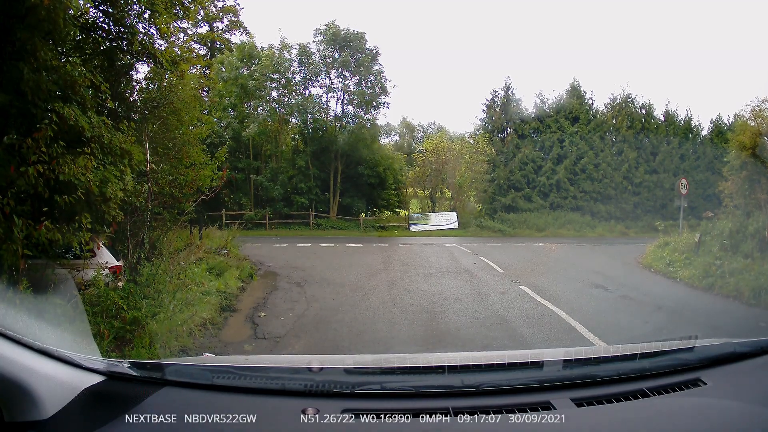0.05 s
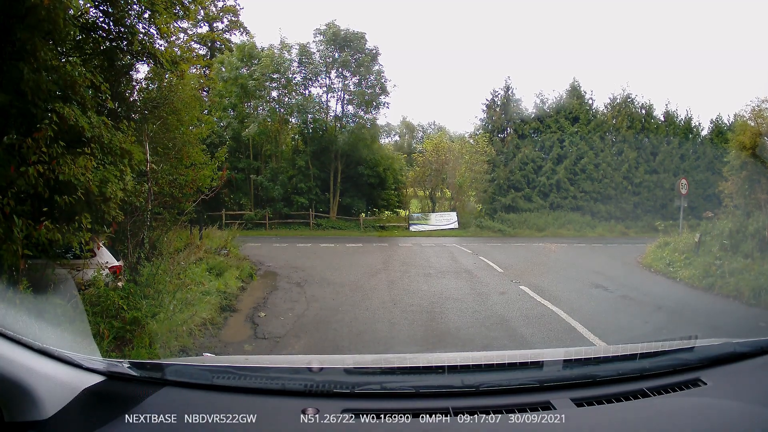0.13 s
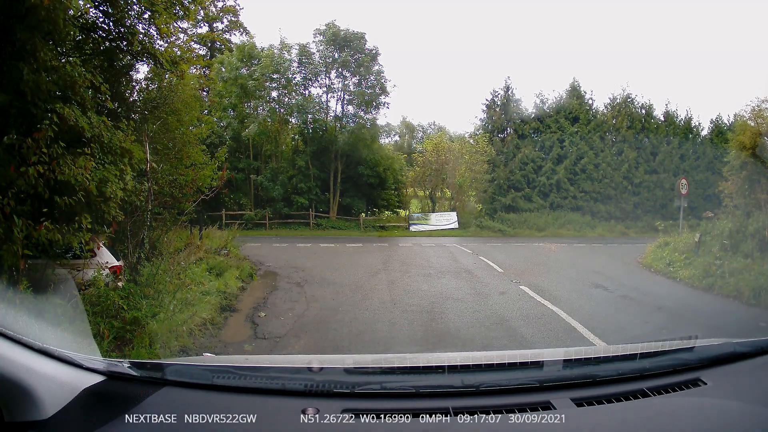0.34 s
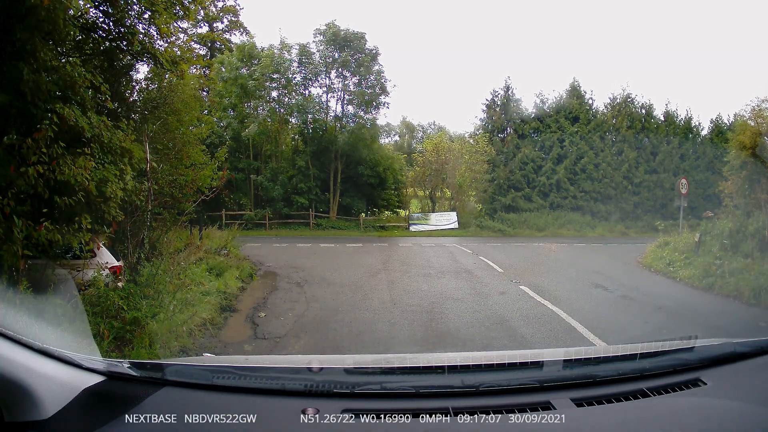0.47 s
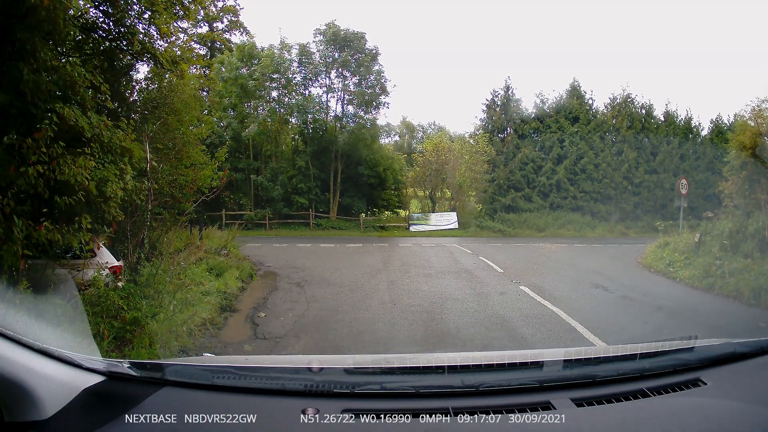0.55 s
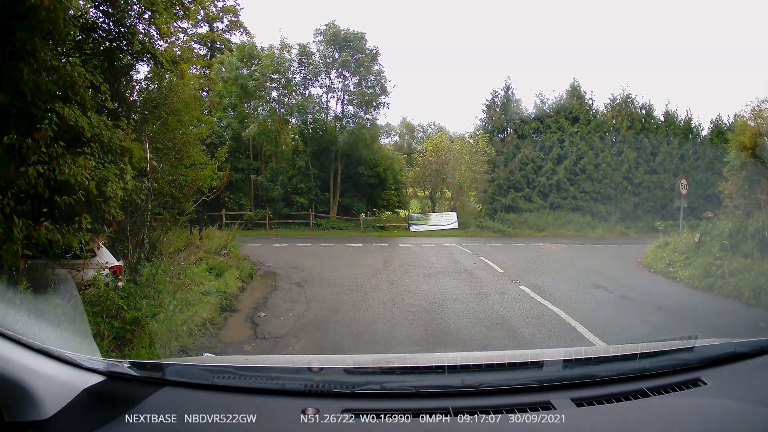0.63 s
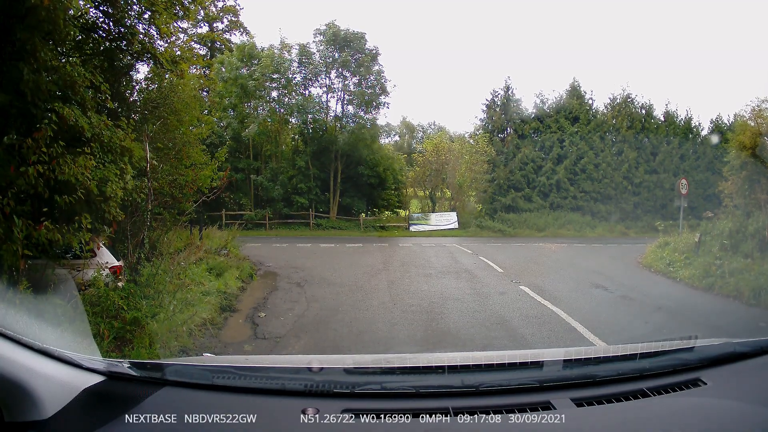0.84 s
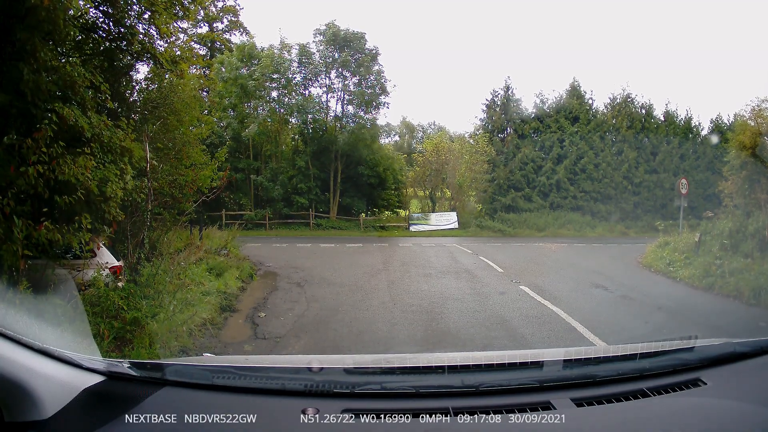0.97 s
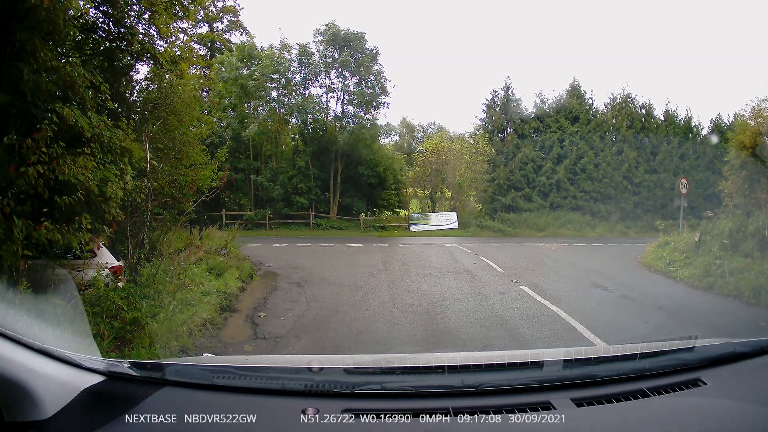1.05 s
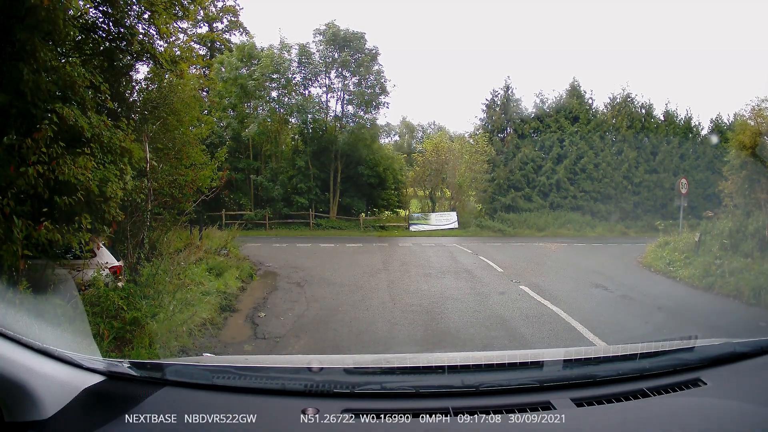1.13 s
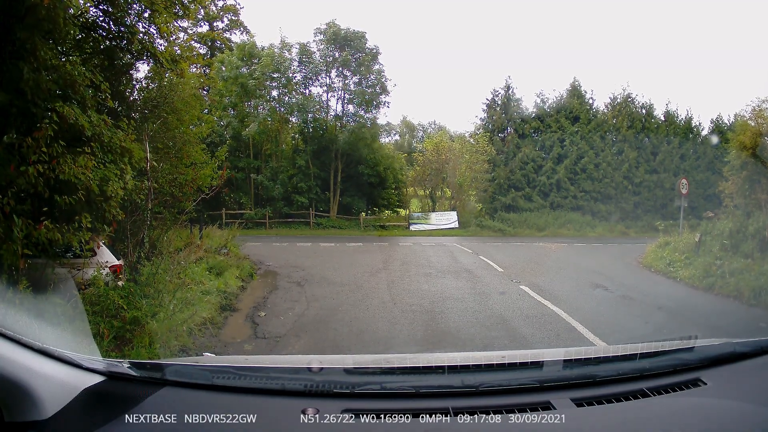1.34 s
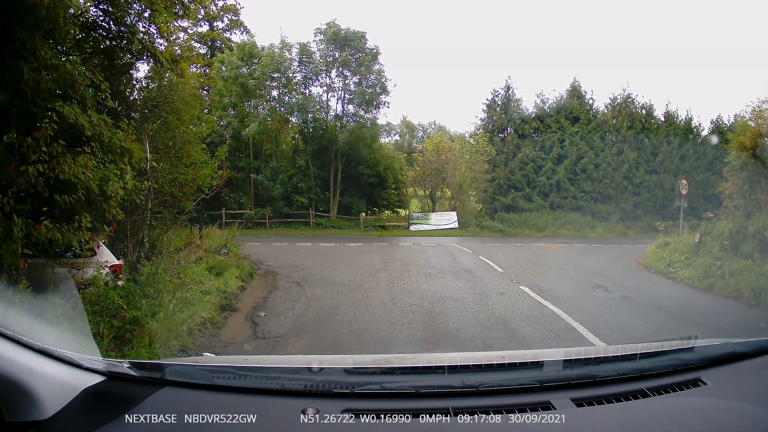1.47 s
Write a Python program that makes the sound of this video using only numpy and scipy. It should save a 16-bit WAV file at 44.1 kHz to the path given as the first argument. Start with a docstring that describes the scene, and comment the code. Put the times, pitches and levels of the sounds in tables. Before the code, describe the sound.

Plastic trim creaks and snaps into place with a loud clunk inside an idling car.

```python
"""Inside a car idling at a country junction, plastic trim is handled close to the microphone.
Over the engine's hum, the trim first ticks and creaks as it sticks and slips. It knocks, slides
with a few low bumps, then snaps home with a clunk that overloads the microphone.
A lighter latch click follows, while the tyre noise of traffic swells outside."""
import sys
import numpy as np
from scipy import signal
from scipy.fft import rfft, irfft
from scipy.io import wavfile

SR = 44100
rng = np.random.default_rng(int(sys.argv[2]) if len(sys.argv) > 2 else 0)


def transcribe(signal):
    """Save signal, clipped to [-1, 1], as a 16-bit WAV file at the path in sys.argv[1]."""
    frames = np.atleast_2d(signal).T
    limited = np.clip(frames, -1, 1)
    pcm = np.round(limited * 32767).astype(np.int16)
    wavfile.write(sys.argv[1], SR, pcm)


N = 66150
T = np.arange(N) / SR


def from_db(db):
    """Turn decibels into a number to multiply a sound by."""
    return 10 ** (np.asarray(db) / 20)


def rms_one(x):
    """Scale a sound so that its average strength (rms) is 1."""
    return x / np.sqrt(np.mean(x ** 2) + 1e-20)


def gains(rows):
    """Turn rows of (time [s], level [dB], ...) into one volume curve per level column."""
    times, *columns = np.transpose(rows)
    return [from_db(np.interp(T, times, levels)) for levels in columns]


def band(x, edges_hz, order=2):
    """Keep the frequencies between two edges, at strength 1."""
    band_pass = signal.butter(order, edges_hz, "band", fs=SR, output="sos")
    return rms_one(signal.sosfilt(band_pass, x))


def noise(spectrum):
    """Steady noise of strength 1, shaped by rows of (frequency [Hz], relative level [dB])."""
    hz, db = np.transpose(spectrum)
    f = np.maximum(np.arange(N // 2 + 1) * SR / N, 1)
    shape = from_db(np.interp(np.log(f), np.log(hz), db))
    return rms_one(irfft(rfft(rng.standard_normal(N)) * shape, N))


def drift(rate_hz):
    """A slow random wobble of strength 1."""
    f = np.arange(N // 2 + 1) * SR / N
    return rms_one(irfft(rfft(rng.standard_normal(N)) / (1 + (f / rate_hz) ** 2), N))


def envelope(start, rise, fade):
    """A volume curve that rises in a straight line, then falls 60 dB every `fade` seconds."""
    rise = max(rise, 1 / SR)
    return np.clip((T - start) / rise, 0, 1) * from_db(-60 * np.maximum(T - start - rise, 0) / fade)


def cabin_noise():
    """The inside of the car rumbles and the fan hisses."""
    # tone of the rumble and hiss: (frequency [Hz], relative level [dB])
    spectrum = [(20, -16.5), (45, -1), (85, -23.5), (125, -8.5), (300, -13.5), (600, -24), (1500, -34),
                (2500, -29.5), (4500, -34.5), (6800, -38), (8500, -65.5)]
    # their loudness: (time [s], level [dB])
    levels = [(0, -40.5), (0.3, -39), (0.7, -38), (0.95, -42), (1.2, -42), (1.5, -46)]
    return gains(levels)[0] * noise(spectrum)


def traffic():
    """A passing vehicle's low drone and tyre noise come through the glass."""
    # tone of the drone: (frequency [Hz], relative level [dB])
    drone = [(25, -12), (68, 1.5), (110, -4.5), (160, -1), (260, -10.5), (380, -9), (520, -9.5), (700, -9),
             (1200, -31.5), (3000, -42.5)]
    # tone of the tyres: (frequency [Hz], relative level [dB])
    tyres = [(200, -20), (500, -18), (720, -5), (950, 2), (1200, -8.5), (1600, -12), (2250, -24.5),
             (3500, -39), (6800, -59), (8500, -82)]
    # loudness as it passes: (time [s], drone level [dB], tyre level [dB])
    passing = [(0, -48.5, -51), (0.3, -52, -66), (0.55, -38.5, -44), (0.8, -37, -37), (1.0, -34, -36.5),
               (1.14, -33, -34), (1.28, -38.5, -34.5), (1.5, -38, -36.5)]
    drone_gain, tyre_gain = gains(passing)
    return drone_gain * noise(drone) + tyre_gain * noise(tyres)


def engine():
    """The idling engine hums two low notes that waver in pitch and level and slowly get quieter."""
    # notes of the hum: (pitch [Hz], average level at the start [dB])
    hum = [(82, -39.5), (108, -38.5)]
    waver_db, wander_hz, fade_db_per_s = 1.5, 2.5, 3
    out = 0
    for hz, db in hum:
        gain = from_db(db + waver_db * drift(4) - fade_db_per_s * T)
        phase = 2 * np.pi * np.cumsum(hz + wander_hz * drift(6)) / SR
        out += gain * np.sqrt(2) * np.sin(phase)
    return out


def pings():
    """Small metal parts ring on faintly after a jolt."""
    # ringing parts: (time [s], pitch [Hz], level [dB], fade [s])
    parts = [(0.455, 2950, -41.5, 0.27), (0.865, 5180, -62.5, .5)]
    return sum(from_db(db) * envelope(start, 0, fade) * np.sin(2 * np.pi * hz * (T - start))
               for start, hz, db, fade in parts)


def slips(per_second=5500, spread_db=2):
    """Rubbing surfaces stick and slip, making a stream of tiny clicks of uneven size."""
    sizes = from_db(spread_db * np.minimum(rng.exponential(1, N), 4)) * rng.choice([-1, 1], N)
    return sizes * (rng.random(N) < per_second / SR)


def trim_ring(x):
    """The plastic trim colours a contact sound by ringing at its own pitches."""
    # pitches of the trim: (pitch [Hz], width [Hz], boost [dB])
    resonances = [(2300, 66, 2), (2420, 43, 4.5), (3535, 74, 6), (4020, 64, 2.5), (4490, 74, 5),
                  (4870, 140, -0.5), (6370, 81, 7.5)]
    out = x
    for hz, width_hz, db in resonances:
        r = np.exp(-np.pi * width_hz / SR)  # share of the ringing left after one sample
        feed = (1 - r * r) / 2
        feedback = [1, -2 * r * np.cos(2 * np.pi * hz / SR), r * r]
        ringing = signal.lfilter([feed, 0, -feed], feedback, x + 1e-18)
        out = out + (from_db(db) - 1) * ringing
    return out


def ticks():
    """Each tick or creak is a short burst of slips, plus a note from the part that slipped."""
    # ticks of the plastic: (time [s], rise [s], fade [s], low band [relative dB],
    # middle band [relative dB], top band [relative dB], note pitch [Hz], note level [dB])
    events = [(0.001, .002, 0.13, -52, -45, -47, 3300, -55),
              (0.027, 0.0013, 0.047, -43, -35.5, -37.5, 2650, -35),
              (0.086, 0.0014, 0.061, -41.5, -56, -50, 2430, -43),
              (0.0936, .001, 0.079, -57, -45.5, -35, 5350, -39),
              (0.122, 0.0022, 0.056, -47, -48, -48, 1780, -37.5),
              (0.148, 0.00086, 0.056, -31.5, -46, -38.5, 2520, -30.5),
              (0.157, 0.011, 0.066, -40, -40.5, -33, 2500, -27),
              (0.17, 0.0037, 0.091, -42.5, -34.5, -35.5, 3120, -34),
              (0.202, 0.0016, 0.047, -35, -33, -39, 2480, -28),
              (0.239, 0.0017, .05, -59, -51.5, -54.5, 2870, -45),
              (0.255, 0.0039, 0.028, -42, -35, -46, 3010, -28),
              (0.273, 0.00096, 0.033, -40, -38, -39, 4400, -28),
              (0.3202, 0.0004, 0.038, -29, -43.5, -21, 4180, -23),
              (0.338, 0.0024, 0.2, -61, -49, -46.5, 2100, -53),
              (0.374, 0.0046, 0.038, -39.5, -35, -37, 2240, -33.5),
              (0.396, .003, .06, -45, -37, -41.5, 2440, -31.5),
              (0.5361, 0.0015, 0.022, -44.5, -48.5, -38, 2650, -37),
              (0.573, 0.0036, 0.036, -31, -39, -42, 2120, -32),
              (0.6657, 0.0018, 0.043, -59, -49.5, -65, 2020, -33.5),
              (0.740, 0.0018, 0.11, -42.5, -48, -47.5, 2150, -47),
              (0.840, 0.0063, 0.16, -49, -51, -49, 2990, -53),
              (1.074, 0.0037, 0.16, -64.5, -52.5, -57.5, 2180, -62),
              (1.116, 0.0016, 0.052, -57, -48, -63, 1840, -44),
              (1.362, 0.0035, 0.048, -57, -46.5, -72, 2030, -35.5)]
    # the low, middle and top bands of the friction: (low edge [Hz], high edge [Hz])
    bands = [(1900, 3000), (3000, 4800), (5000, 7300)]
    friction_db, overtone_ratio, overtone_db = 3.5, 1.75, -6.5
    friction = notes = 0
    for k, edges in enumerate(bands):
        force = sum(from_db(row[3 + k]) * envelope(*row[:3]) for row in events)
        friction += force * band(slips(), edges, order=4)
    for start, rise, fade, *_, hz, db in events:
        phase = 2 * np.pi * hz * (T - start)
        note = np.sin(phase) + from_db(overtone_db) * np.sin(overtone_ratio * phase)
        notes += from_db(db) * envelope(start, rise, fade) * note
    return from_db(friction_db) * trim_ring(friction) + notes


def thuds(rows, overtone_db, overtone_ratio=2.11):
    """Each soft contact rings one dying note and a weaker, higher one that fades along with it."""
    out = 0
    for start, hz, db, rise, fade in rows:
        phase = 2 * np.pi * hz * (T - start)
        shape = envelope(start, rise, fade)
        overtone = from_db(overtone_db) * shape * np.sin(overtone_ratio * phase)
        out += from_db(db) * shape * (np.sin(phase) + overtone)
    return out


def knocks_and_bumps():
    """The trim knocks softly and its mount gives low bumps."""
    # soft knocks: (time [s], pitch [Hz], level [dB], rise [s], fade [s])
    knocks = [(0.2145, 323, -13, 0.0047, 0.054), (0.259, 386.5, -23, 0.0059, 0.07),
              (0.346, 398, -25, .003, 0.064), (0.3738, 474, -9.5, 0.0022, 0.042),
              (0.381, 354, -7.5, 0.0007, 0.037), (0.392, 225, -9, 0.01, 0.03),
              (0.563, 400, -19.5, .002, 0.056)]
    # bumps of the mount: (time [s], pitch [Hz], level [dB], rise [s], fade [s])
    bumps = [(0.222, 82.5, -18.5, 0.02, 0.16), (0.288, 85, -22, 0.011, 0.052),
             (0.390, 50.76, -14, 0.033, .13), (0.435, 114.8, -13, 0.039, 0.043),
             (0.440, 43.5, -11.5, 0.017, 0.2), (0.470, 50, -15, 0.02, 0.15),
             (0.505, 76.4, -15.5, 0.0078, 0.049), (0.600, 184.7, -14, 0.011, 0.08),
             (0.596, 110, -13.5, 0.0084, 0.094), (0.600, 47.8, -21.5, .006, 0.18),
             (0.866, 91.5, -21, 0.0032, 0.31), (0.868, 176.9, -20, 0.0085, 0.091),
             (1.08, 75.9, -27.5, 0.042, .5)]
    return thuds(knocks, overtone_db=-26) + thuds(bumps, overtone_db=-5)


def slide():
    """Plastic rubs on plastic, making a hollow sound and a scratch."""
    # loudness of the rubbing: (time [s], hollow level [dB], scratch level [dB])
    levels = [(0.0, -88, -56), (0.12, -40.5, -47.5), (0.18, -37, -42), (0.27, -42, -45), (0.33, -56, -90),
              (0.368, -51, -48), (0.38, -26, -38), (0.411, -23, -41.5), (0.43, -23, -31.5),
              (0.454, -20, -24.5), (0.472, -33, -51.5), (0.495, -40, -67), (0.54, -49, -52),
              (0.6, -73, -63.5)]
    hollow_hz, scratch_hz, dull_above_hz = (150, 680), (750, 5800), 1530
    hollow_gain, scratch_gain = gains(levels)
    dull_slips = signal.sosfilt(signal.butter(1, dull_above_hz, fs=SR, output="sos"), slips())
    hollow = hollow_gain * band(slips(), hollow_hz)
    scratch = scratch_gain * band(dull_slips, scratch_hz)
    return trim_ring(hollow + scratch)


def rasps(edge_ratio=1.3):
    """The sliding part catches for an instant and rasps."""
    # short rasps: (time [s], rise [s], fade [s], centre frequency [Hz], level [dB])
    catches = [(0.259, 0.0022, .05, 750, -32), (0.418, .0015, 0.012, 1490, -21),
               (0.436, .002, 0.036, 1600, -23), (0.574, .004, .05, 800, -19.5),
               (0.743, .002, .04, 1000, -30), (0.859, .002, .03, 1500, -34.5)]
    out = 0
    for start, rise, fade, hz, db in catches:
        grit = band(slips(), (hz / edge_ratio, hz * edge_ratio))
        out += from_db(db) * envelope(start, rise, fade) * grit
    return out


def cabin_echo(x, band_hz=(180, 900), echo_db=-19.5):
    """The dashboard and cabin answer a blow with a short, dull tail of sound."""
    tail = band(rng.standard_normal(N), band_hz) * envelope(start=0.0046, rise=0.01, fade=0.27)
    tail /= np.sqrt(np.sum(tail ** 2) * SR / 2 / np.ptp(band_hz))  # gain of about 1 inside the band
    return x + from_db(echo_db) * signal.fftconvolve(x, tail)[:N]


def snap(hits, notes, grit_bands, grind_s, grind_fade_s):
    """A part snaps into place: quick contacts make it ring while the catch grinds shut."""
    ringing = 0
    for start, hit_db in hits:
        for k, (hz, note_db, fade) in enumerate(notes):
            note = (-1) ** k * np.sin(2 * np.pi * hz * (T - start))  # every other note is flipped
            ringing += from_db(hit_db + note_db) * envelope(start, 0, fade) * note
    stop_ceiling = 1.25  # the ringing part rattles between its stops, so loud peaks flatten; the grit rides on top
    ringing = stop_ceiling * np.tanh(ringing / stop_ceiling)
    grit = sum(from_db(db) * band(slips(), (low, high), order=3) for low, high, db in grit_bands)
    first_hit = hits[0][0]
    release = first_hit + grind_s
    force = np.where(T < release, T >= first_hit, envelope(release, 0, grind_fade_s))  # hold, then fade
    return ringing + trim_ring(grit * force)


def latch():
    """The latch clicks shut with two light contacts."""
    # contacts of the latch: (time [s], strength [dB])
    hits = [(0.8645, -17.5), (0.8715, -29.5)]
    # notes it rings at: (pitch [Hz], relative level [dB], fade [s])
    notes = [(255.4, -12.5, 0.18), (572, 2, 0.05), (814, -4, 0.042), (1024, -8.5, 0.096),
             (1580, -16, 0.082), (2420, -29, 0.022), (3510, -25, 0.066)]
    # grinding of its catch: (low edge [Hz], high edge [Hz], level [dB])
    grit_bands = [(700, 2530, -25), (2670, 4500, -28.5), (4460, 6100, -33.5)]
    return snap(hits, notes, grit_bands, grind_s=0.00065, grind_fade_s=0.046)


def clunk():
    """The trim snaps home with three hard contacts, each weaker than the last."""
    # contacts of the trim: (time [s], strength [dB])
    hits = [(0.5827, 3), (0.5878, -3), (0.5928, -10)]
    # notes it rings at: (pitch [Hz], relative level [dB], fade [s])
    notes = [(174.8, -18.5, .16), (239, -16, 0.16), (319.5, -12.5, 0.14), (389.3, 1.5, 0.056),
             (632, -7, 0.081), (752, -11, .06), (931.6, -12.5, 0.12), (1157, -21.5, 0.037),
             (1380, -33, .06), (1658, -8, 0.067), (2530, -28.5, 0.092), (3580, -23, 0.033),
             (4460, -33, 0.076)]
    # grinding of its catch: (low edge [Hz], high edge [Hz], level [dB])
    grit_bands = [(540, 1420, -13.5), (1800, 5540, -16.5), (4700, 4800, -28.5)]
    return snap(hits, notes, grit_bands, grind_s=0.013, grind_fade_s=0.057)


def scene():
    """All the sounds add up and reach the left channel a moment after the right."""
    snaps = clunk() + latch()
    handling = ticks() + slide() + rasps() + pings() + knocks_and_bumps()
    right = handling + cabin_echo(snaps) + engine() + cabin_noise() + traffic()
    left_lag_s = 0.000065
    left = np.interp(T - left_lag_s, T, right)
    return np.array([left, right])


def record(dry):
    """The microphone overloads, flattening the clunk's peaks; the highest treble is cut."""
    ceiling, sharpness, cutoff_hz = 1.05, 6, 7600
    flattened = dry / (1 + np.abs(dry / ceiling) ** sharpness) ** (1 / sharpness)
    low_pass = signal.butter(12, cutoff_hz, fs=SR, output="sos")
    return np.clip(signal.sosfilt(low_pass, flattened), -1, 1)


dry = scene()
out = record(dry)
transcribe(out)
```